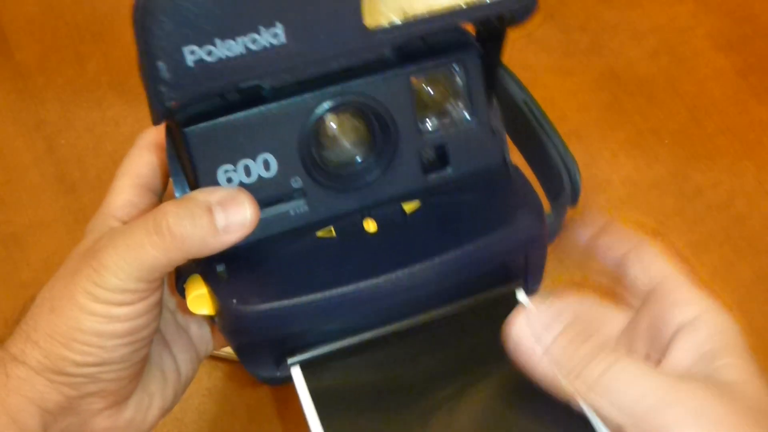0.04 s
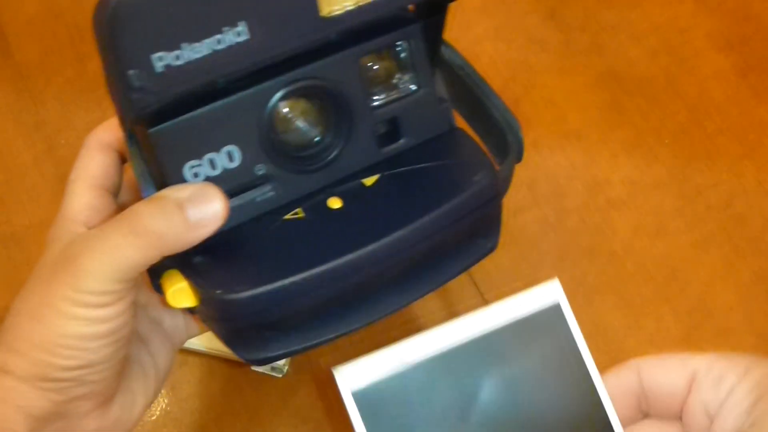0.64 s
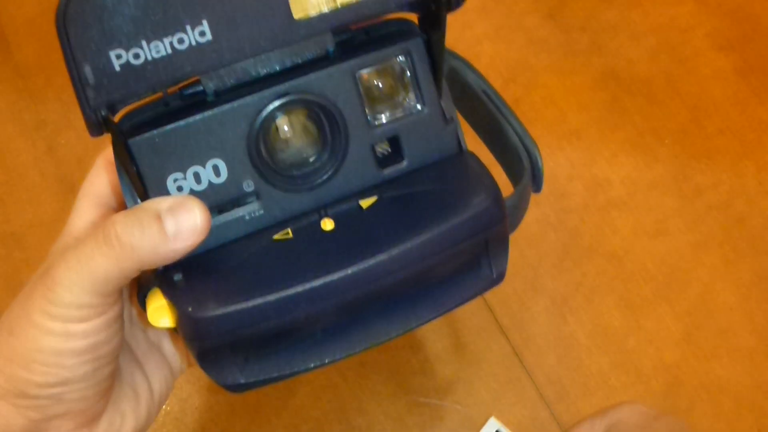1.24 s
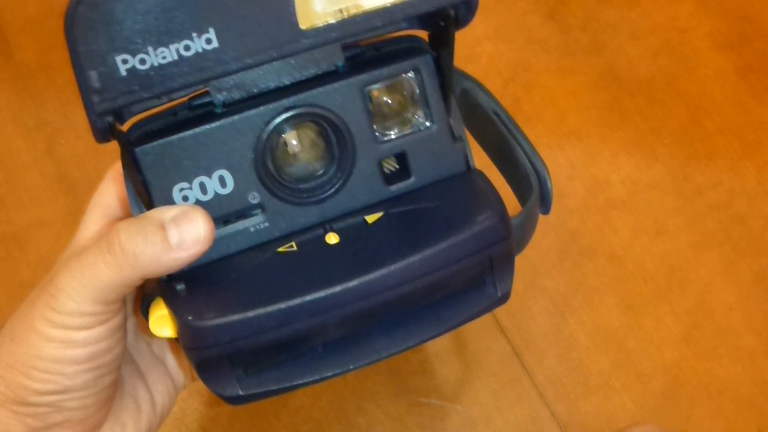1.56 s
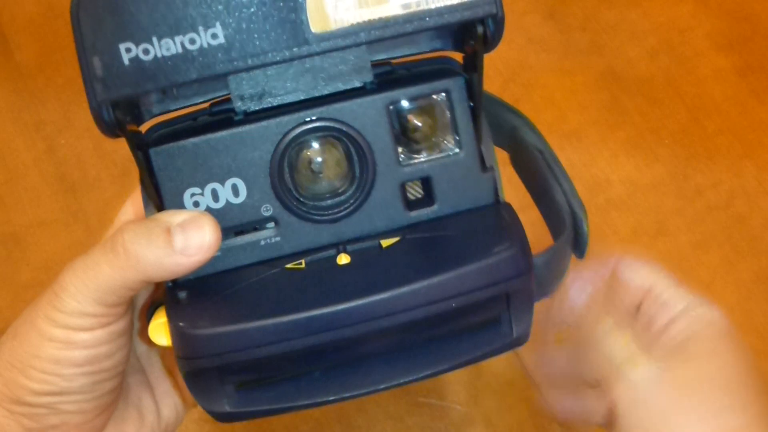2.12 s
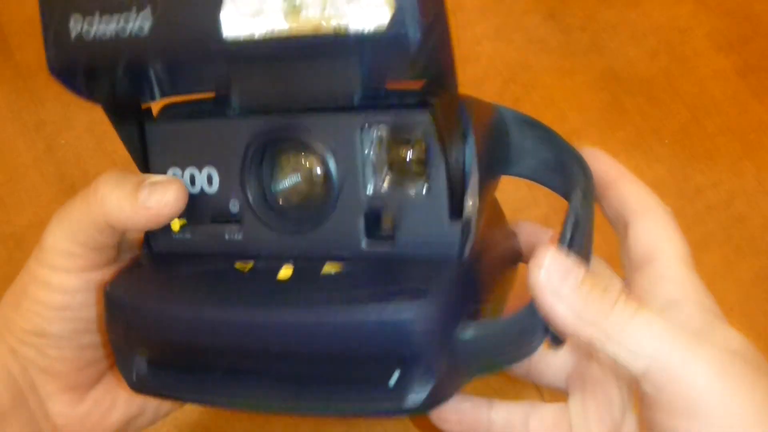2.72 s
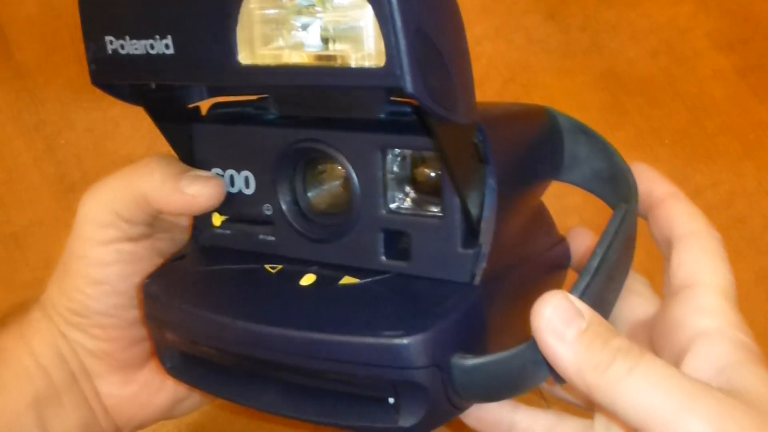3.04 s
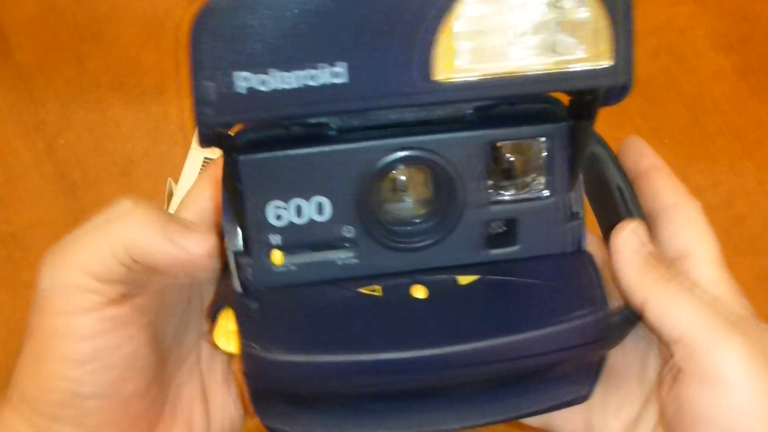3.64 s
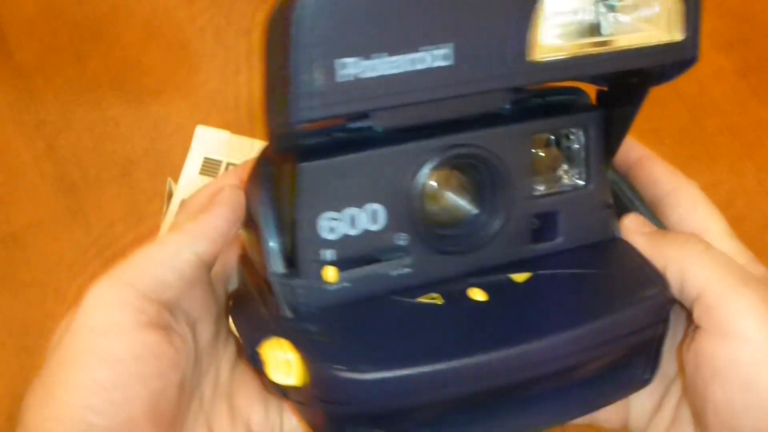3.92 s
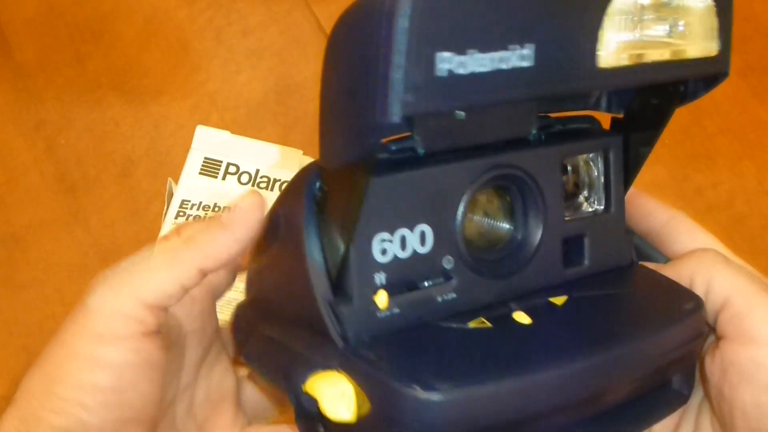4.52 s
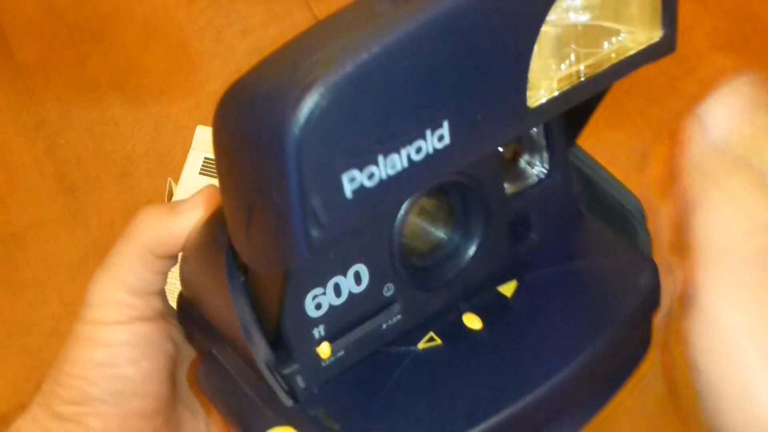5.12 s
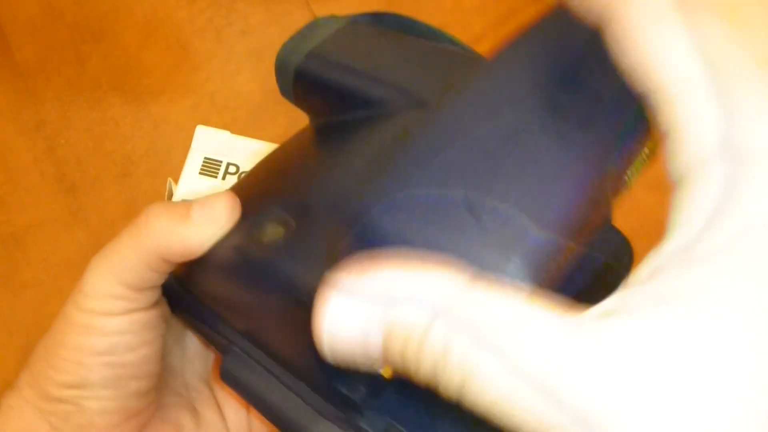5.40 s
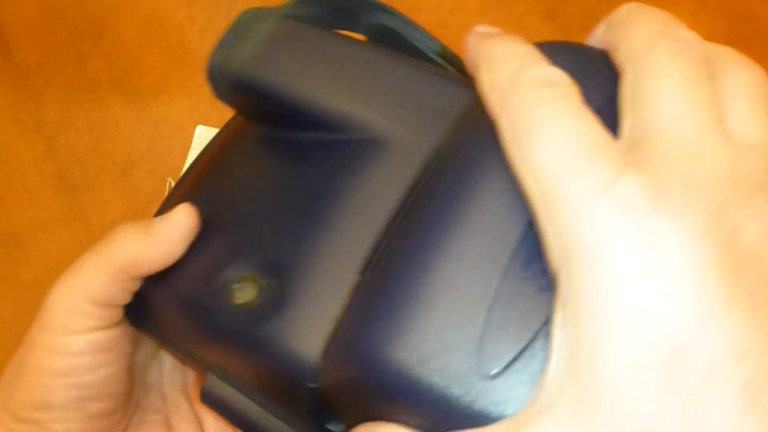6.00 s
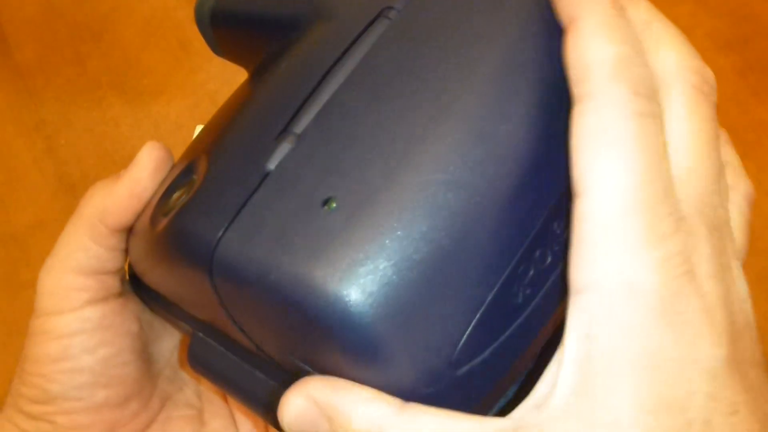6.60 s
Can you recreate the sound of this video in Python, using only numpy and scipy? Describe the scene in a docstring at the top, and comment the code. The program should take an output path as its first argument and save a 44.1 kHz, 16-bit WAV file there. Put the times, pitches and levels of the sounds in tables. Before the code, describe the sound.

An instant camera motor whirs briefly and clacks, then hands tap and creak its plastic body and snap it shut.

```python
"""Instant camera, close up

Above a table in a small room, a motor pushes out a print and stops with a clack. The print is pulled
free and the slot snaps shut; the flash recharges with a thin rising whistle. Hands turn the hollow
plastic body, then fold the flash hood down: it rubs, creaks, catches and latches."""
import sys
import numpy as np
from scipy import signal
from scipy.fft import rfft, irfft
from scipy.io import wavfile
from scipy.ndimage import map_coordinates

SR = 44100
rng = np.random.default_rng(int(sys.argv[2]) if len(sys.argv) > 2 else 0)


def log_audio(samples):
    """Write samples as a 16-bit WAV file to the path given in sys.argv[1]."""
    # one column per channel
    frames = np.atleast_2d(samples).T
    # limit to full scale, then quantise
    limited = np.clip(frames, -1, 1)
    pcm = np.round(limited * 32767).astype(np.int16)
    wavfile.write(sys.argv[1], SR, pcm)


N = 298116
TIME = np.arange(N) / SR
PRINT_FREE_S = .54

# spectrum of rubbed plastic: (frequency [Hz], level [dB])
RUB_COLOUR = [(300, -15), (600, 0), (830, 5.5), (1200, -2), (1700, -7.5), (2400, -8.5), (3500, -17.5),
              (7000, -26.5), (15000, -30)]


def undb(db):
    """Decibels to gain."""
    return 10 ** (np.asarray(db) / 20)


def unit(x):
    """Scale to rms 1."""
    return x / np.sqrt(np.mean(x ** 2))


def fader(rows):
    """Gain along (time [s], level [dB]) rows, silent outside them."""
    s, db = np.transpose(rows)
    return undb(np.interp(TIME, s, db, left=-150, right=-150))


def gate(start_s, end_s, edge_s=.005):
    """On between two times, with linear ramps."""
    return np.clip((TIME - start_s) / edge_s, 0, 1) * np.clip((end_s - TIME) / edge_s + 1, 0, 1)


def band(x, lo_hz, hi_hz, order=2):
    """Causal band-pass."""
    sos = signal.butter(order, [lo_hz, min(hi_hz, .48 * SR)], "band", fs=SR, output="sos")
    return signal.sosfilt(sos, x)


def colour(x, points):
    """Shape by (frequency [Hz], level [dB]) points; rms 1."""
    hz, db = np.transpose(points)
    bins_hz = np.maximum(np.fft.rfftfreq(len(x), 1 / SR), 1)
    gain = undb(np.interp(np.log(bins_hz), np.log(hz), db))
    return unit(irfft(rfft(x) * gain, len(x)))


def grains(rate_per_s, spread_db):
    """Tiny slips of uneven size at random times; rms 1."""
    slips = (rng.random(N) < rate_per_s / SR) * rng.standard_normal(N)
    return unit(slips * undb(spread_db * rng.standard_normal(N)))


def wander(rate_per_s):
    """Smooth random drift; rms 1."""
    steps = rng.standard_normal(1000)
    return unit(map_coordinates(steps, [TIME * rate_per_s], mode="wrap"))


def add(out, start_s, sound):
    """Mix a sound in at a time."""
    i = int(start_s * SR)
    out[i:i + len(sound)] += sound[:max(N - i, 0)]


def attack_level(x, db):
    """Set the rms of the first 6 ms."""
    return x * undb(db) / np.sqrt(np.mean(x[:264] ** 2))


def background(air_db=-43.5, whine_db=-63, whine_hz=7800, flutter_hz=25, flutter_depth=0.13):
    """Steady room air and hiss, with a thin fluttering electronic whine."""
    # room air and microphone hiss: (frequency [Hz], spectral density [dB])
    air_colour = [(15, -54), (25, -13), (37, -26), (113, -0.5), (371, 1.5), (1280, -9), (2460, -13.5),
                  (2890, -14.5), (3220, -16), (7220, -23.5), (7830, -23), (11700, -29), (12700, -27),
                  (14200, -33), (15800, -33)]
    air = colour(rng.standard_normal(N), air_colour)
    flutter = 1 + flutter_depth * np.sin(2 * np.pi * flutter_hz * TIME)
    whine = unit(np.sin(2 * np.pi * whine_hz * TIME) * flutter)
    return undb(air_db) * air + undb(whine_db) * whine


def motor(start_db=-27, mesh_hz=410, teeth_db=-9, stop_s=.059, rest_s=0.16,
          sag_db_per_s=102, coast_db_per_s=92, rest_db_per_s=400):
    """Gear teeth click unevenly, rollers hiss over the print; the train runs down after the stop."""
    # spectrum of gears and rollers: (frequency [Hz], level [dB])
    drive_colour = [(120, -33), (250, -7), (500, -4), (800, 5), (1150, 2), (1750, -2), (2700, -1.5),
                    (3350, -3), (4300, -6), (6500, -6), (10000, -5.5), (13500, -10), (16000, -23)]
    coast_s = np.maximum(TIME - stop_s, 0)
    tooth_hz = mesh_hz * np.exp(-coast_s / 0.33)
    teeth = np.diff(np.floor(np.cumsum(tooth_hz) / SR), prepend=0)
    teeth *= undb(3.3 * rng.standard_normal(N)) * np.sqrt(SR / mesh_hz)
    drive = colour(rng.standard_normal(N) + undb(teeth_db) * teeth, drive_colour)
    db = start_db - sag_db_per_s * np.minimum(TIME, stop_s) - coast_db_per_s * coast_s
    db -= rest_db_per_s * np.maximum(TIME - rest_s, 0)
    return drive * undb(np.maximum(db, -200))


def case_ring(t, knock_db, crack_db, crack_hz, ring_db=-24, scatter_db=5.0, near_db=7):
    """Shell and springs ring: low modes follow the knock, high ones the crack, most near its pitch."""
    # case modes: (frequency [Hz], T60 [s], level [dB])
    case_modes = [(456, 0.12, 11.5), (615, 0.13, 8.5), (843, 0.21, 5.5), (1080, .14, -11),
                  (1270, 0.12, -15), (1415, 0.33, -1), (1573, 0.055, 7.5), (2350, 0.2, -2),
                  (2540, 0.038, 13), (4140, .16, -2), (4250, .18, 1), (4600, .2, -11), (4430, .2, -3),
                  (4940, .2, -6), (5130, .2, -10), (5900, .15, -11), (6700, 0.18, -6)]
    hz, t60_s, db = np.transpose(case_modes)[:, :, None]
    nearness = np.exp(-(np.log2(hz / crack_hz) / 0.41) ** 2)
    push_db = np.interp(hz, [1500, 2600], [knock_db, crack_db]) + near_db * (nearness - .5)
    push_db += scatter_db * rng.standard_normal(hz.shape)
    modes = np.sin(2 * np.pi * (hz * t + rng.random(hz.shape)))
    modes *= undb(push_db + db + ring_db - 60 * t / t60_s)
    return modes.sum(axis=0) * (1 - np.exp(-t / 0.00031))


def blow(knock_db, thump_db, crack_db, tick_db, brightness_hz, crack_hz, tick_t60_s=0.028):
    """A blow swings a damped panel, thumps the hollow body, cracks at the contact and rings the case."""
    t = TIME[:SR // 4]

    def decay(t60_s):
        return undb(-60 * t / t60_s)

    noise = rng.standard_normal((3, len(t))) * (1 - np.exp(-t / 0.0003))
    # harder contact: higher panel pitch, more chatter from loose inner parts
    hardness = np.log2(brightness_hz / 1100)
    panel_hz = 905 * 2 ** (0.35 * hardness)
    panel = np.sin(2 * np.pi * panel_hz * t) * decay(0.013) * (1 - np.exp(-t / 0.0004))
    rattle = band(noise[0] * decay(0.023), 1024, 1810)
    knock = attack_level(band(panel, 425, 3700), 0) + attack_level(rattle, -3 + 12 * hardness)
    thump = band(np.sin(2 * np.pi * 480 * t) * decay(0.015), 213, 530, order=1)
    contact = band(noise[1] * decay(0.014), 1800, 5900, order=3)
    edge = band(contact, crack_hz / 1.44, crack_hz * 1.17)  # the struck edge favours one range
    crack = attack_level(contact, 0) + attack_level(edge, 0)
    tick = band(noise[2] * decay(tick_t60_s), 3700, 14600)
    low = attack_level(knock, knock_db) + attack_level(thump, thump_db)
    high = attack_level(crack, crack_db) + attack_level(tick, tick_db)
    return low + high + case_ring(t, knock_db, crack_db, crack_hz)


def clacks(hollow_db=5, dull_db=-7):
    """Hard blows, each followed by a softer, duller, hollower rebound."""
    # motor stop, slot flap, two bumps, hood catch, two-stage latch: (time [s], knock [dB], thump [dB],
    # crack [dB], tick [dB], brightness [Hz], crack pitch [Hz], rebound delay [s], rebound gain [dB])
    hard_blows = [(.059, -13, -28.5, -18, -23.5, 1190, 5300, 0.0073, -11),
                  (0.5404, -15.5, -31, -23, -27, 1250, 2800, .0036, -6.5),
                  (2.222, -26, -31, -42, -54, 1170, 2800, 0.0084, -5),
                  (4.316, -27, -43, -43.5, -47, 870, 4300, .006, -14),
                  (6.124, -16, -50, -20, -32, 1230, 2730, 0.017, -8),
                  (6.7355, -18, -28.5, -20, -23.5, 1150, 3100, .0125, -13),
                  (6.7393, -7, -16, -20.5, -21, 1150, 4090, 0.016, -20)]
    out = np.zeros(N)
    for s, knock, thump, crack, tick, brightness_hz, crack_hz, delay_s, rebound_db in hard_blows:
        add(out, s, blow(knock, thump, crack, tick, brightness_hz, crack_hz))
        rebound = blow(knock, thump + hollow_db, crack + dull_db, tick + dull_db,
                       0.61 * brightness_hz, crack_hz)
        add(out, s + delay_s, undb(rebound_db) * rebound)
    return out


def print_slide(pull_s=.335, pull_db=-49, rise_db_per_s=18, tug_s=.505, tug_db=0.5, lip_db=-46):
    """The stiff print scrapes through the slot, louder as the pull grows, and hisses over the lip."""
    # spectrum of the scrape: (frequency [Hz], level [dB])
    slide_colour = [(400, -31), (900, 10), (1800, 7), (3000, -9), (6500, -3.5), (10000, -10), (14000, -8),
                    (16000, -23)]
    tug = gate(tug_s, PRINT_FREE_S)
    db = pull_db + rise_db_per_s * (np.minimum(TIME, PRINT_FREE_S) - pull_s) + tug_db * tug
    scrape = colour(grains(rate_per_s=9000, spread_db=3.5), slide_colour)
    hiss = unit(band(rng.standard_normal(N), 10500, 14000))
    return scrape * undb(db) * gate(pull_s, PRINT_FREE_S) + hiss * undb(lip_db) * tug


def ticks():
    """Small hard edges click past each other: dry treble over a light knock."""
    # edge contacts: (time [s], tick [dB], knock [dB])
    contacts = [(0.4393, -41.5, -35), (0.512, -42, -36), (3.333, -48.5, -43), (5.7934, -36.5, -38.5),
                (5.847, -45.5, -56), (5.97, -46, -54), (6.266, -46.5, -40), (6.38, -49, -46),
                (6.709, -42, -40)]
    out = np.zeros(N)
    for s, tick_db, knock_db in contacts:
        add(out, s, blow(knock_db, thump_db=knock_db - 10, crack_db=knock_db - 8, tick_db=tick_db,
                         brightness_hz=1300, crack_hz=4500, tick_t60_s=0.015))
    return out


def flash_whistle(start_hz=2938, limit_hz=9550, half_rise_s=2.5, reflection=.4, flutter_per_s=22):
    """The transformer sings, rising as the capacitor fills; harmonics swell where the housing leaks."""
    # transmission of the housing: (frequency [Hz], gain [dB])
    housing = [(6100, -25), (6440, -1), (6750, -25), (8800, -20), (9200, -2), (11000, -3), (13000, 0),
               (15500, 0), (17000, -80)]
    # whistle reaching the microphone as the body turns: (time [s], level [dB])
    whistle_levels = [(.55, -73), (1.05, -72), (1.3, -68.5), (2.7, -71), (2.95, -60.5), (3.45, -60.5),
                      (3.75, -66), (4.7, -65), (5.05, -57), (5.35, -67), (5.9, -63), (6.76, -61)]
    charge_s = np.maximum(TIME - PRINT_FREE_S, 0)
    hz = start_hz + (limit_hz - start_hz) * charge_s / (charge_s + half_rise_s)
    phase = 2 * np.pi * np.cumsum(hz) / SR
    tone = 0
    for k in range(1, 5):
        leak_db = np.interp(k * hz, *np.transpose(housing))
        tone = tone + undb(leak_db) * np.exp(1j * k * phase)
    # reflections off the moving hands reinforce or cancel
    paths = 1 + reflection * (wander(flutter_per_s) + 1j * wander(flutter_per_s))
    return np.sqrt(2) * np.imag(tone * paths) * fader(whistle_levels)


def fingers(brush_s=1.835, brush_width_s=.035, brush_db=-52, shift_db=-58):
    """One fingertip brushes past; then fingers shift on the turning body."""
    shifts = colour(grains(rate_per_s=100, spread_db=0), RUB_COLOUR) * gate(2.1, 5.9, edge_s=.3)
    brush = unit(band(grains(rate_per_s=6000, spread_db=4), 2000, 15500, order=1))
    brush *= np.exp(-((TIME - brush_s) / brush_width_s) ** 2)
    return undb(brush_db) * brush + undb(shift_db) * shifts


def taps():
    """Soft fingers knock on the body with little edge."""
    # finger taps: (time [s], knock [dB], brightness [Hz])
    finger_taps = [(2.617, -34.5, 1310), (2.803, -39, 950), (4.417, -39, 1330), (4.503, -38.5, 980),
                   (4.653, -39.5, 980), (4.844, -36, 1430), (5.333, -38, 1090), (5.652, -39, 1130)]
    out = np.zeros(N)
    for s, db, brightness_hz in finger_taps:
        add(out, s, blow(db, thump_db=db - 14, crack_db=db - 18, tick_db=db - 24,
                         brightness_hz=brightness_hz, crack_hz=3400))
    return out


def hinge():
    """Plastic sticks and slips on plastic as the hood folds."""
    # hood rubbing on hinge and struts: (time [s], level [dB])
    rub_levels = [(5.45, -48.5), (5.8, -49.5), (5.92, -38), (6.03, -48.5), (6.15, -34.5), (6.28, -40),
                  (6.45, -36), (6.52, -45), (6.72, -54)]
    return colour(grains(rate_per_s=1300, spread_db=2.5), RUB_COLOUR) * fader(rub_levels)


def creaks():
    """Each jerk of the hinge knocks the hood dully, at nearly the same pitch."""
    # hinge jerking free: (time [s], knock [dB])
    jerks = [(5.89, -36), (5.936, -30.5), (5.965, -32.5), (5.986, -31.5), (6.049, -30.5), (6.119, -25),
             (6.177, -33), (6.208, -26), (6.2525, -28.5), (6.382, -25.5), (6.394, -30), (6.5466, -39.5),
             (6.567, -34.5), (6.687, -37.5)]
    out = np.zeros(N)
    for s, db in jerks:
        brightness_hz = 960 * np.exp(0.12 * rng.standard_normal())
        add(out, s, blow(db, thump_db=db - 18, crack_db=db - 23, tick_db=db - 33,
                         brightness_hz=brightness_hz, crack_hz=3150))
    return out


def room(x, wet_db=-8.5, build_s=0.0041):
    """Close walls give a short diffuse tail, duller as it fades."""
    # reverberation time: (frequency [Hz], T60 [s])
    decay_times = [(250, 0.28), (1000, 0.18), (4000, 0.17), (14000, 0.16)]
    hz, t60_s = np.transpose(decay_times)
    t = TIME[:SR // 2]
    tail = np.zeros(len(t))
    for octave_hz in 125 * 2. ** np.arange(8):
        noise = band(rng.standard_normal(len(t)), octave_hz / np.sqrt(2), octave_hz * np.sqrt(2))
        tail += noise * undb(-60 * t / np.interp(octave_hz, hz, t60_s))
    tail *= 1 - np.exp(-(t / build_s) ** 2)
    tail /= np.sqrt(np.sum(tail ** 2))
    return undb(wet_db) * signal.fftconvolve(x, tail)[:N]


def scene():
    """Mechanism and handling in the room, plus dry whistle and background; mono."""
    camera = clacks() + taps() + creaks() + ticks() + motor() + print_slide() + hinge() + fingers()
    return (camera + room(camera) + flash_whistle() + background())[None]


def record(dry, top_hz=15850):
    """Two narrow notches, clipping at full scale, steep low-pass."""
    # recorder notches: (frequency [Hz], width [Hz])
    notches = [(2900, 284), (11720, 900)]
    for hz, width_hz in notches:
        dry = signal.lfilter(*signal.iirnotch(hz, hz / width_hz, fs=SR), dry)
    low_pass = signal.ellip(8, .2, 70, top_hz, fs=SR, output="sos")
    return signal.sosfilt(low_pass, np.clip(dry, -1, 1))


dry = scene()
out = record(dry)
log_audio(out)
```